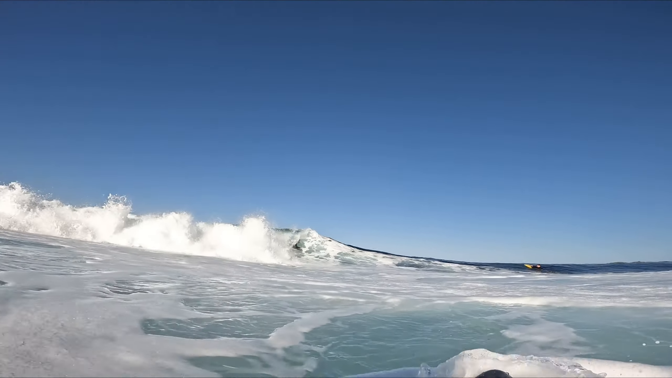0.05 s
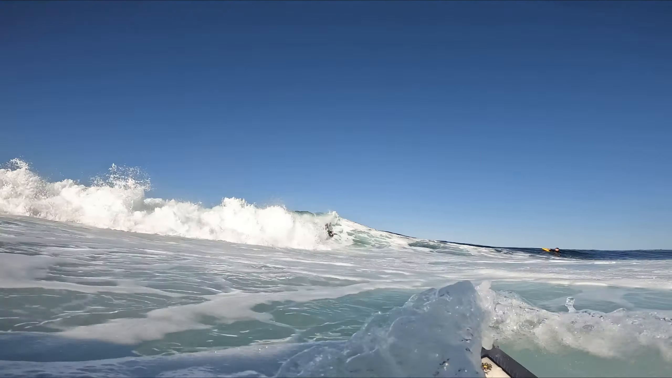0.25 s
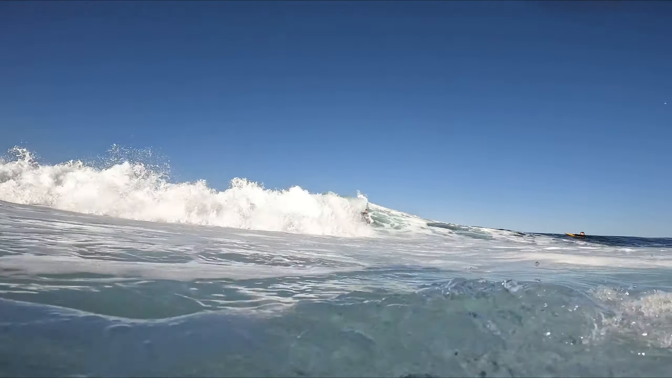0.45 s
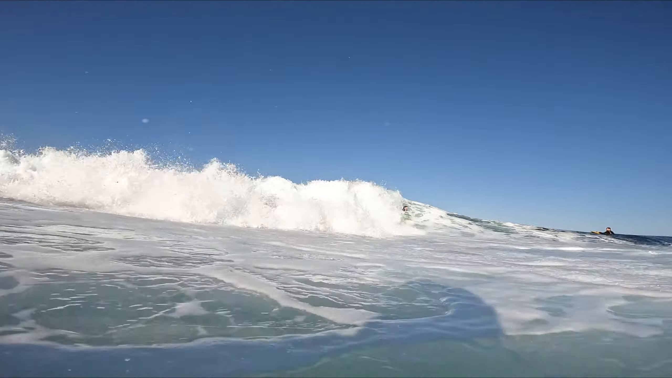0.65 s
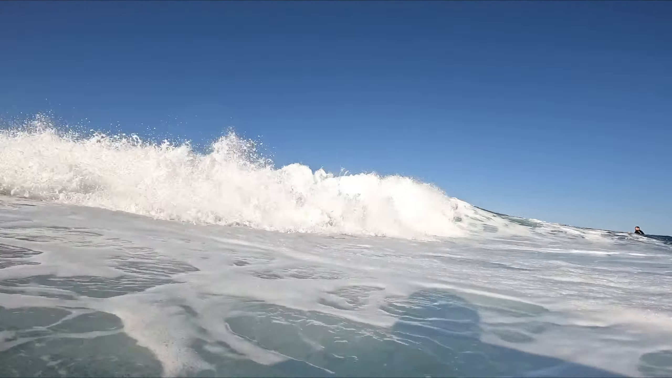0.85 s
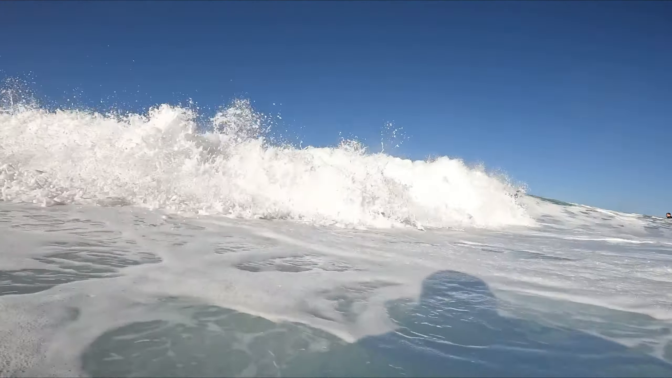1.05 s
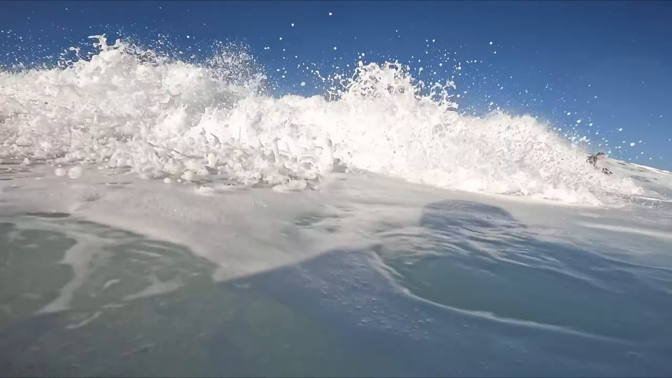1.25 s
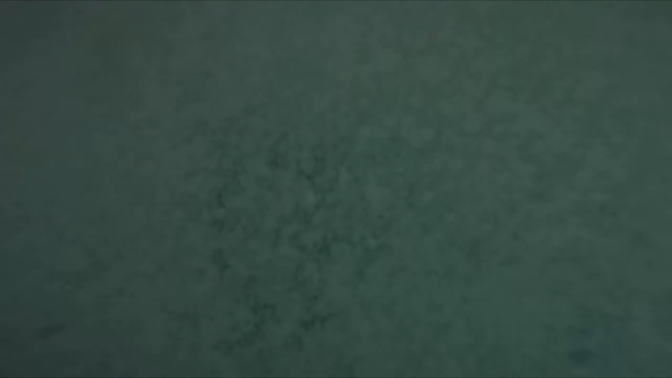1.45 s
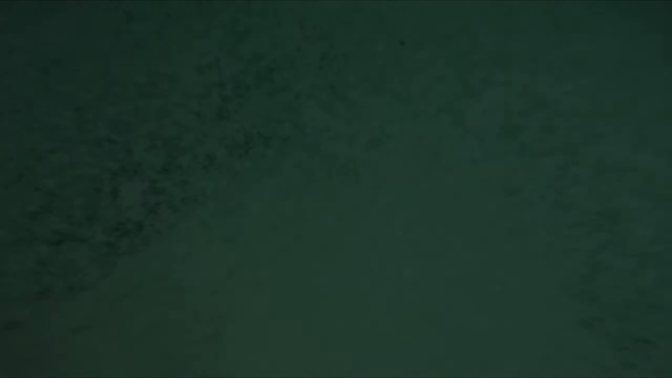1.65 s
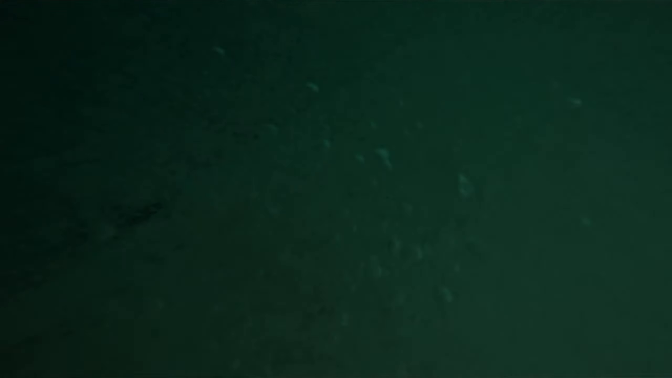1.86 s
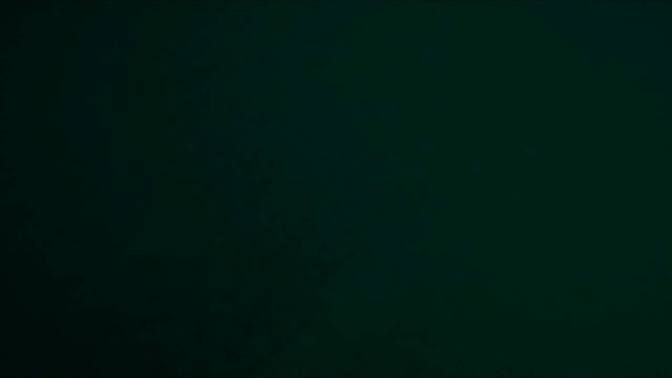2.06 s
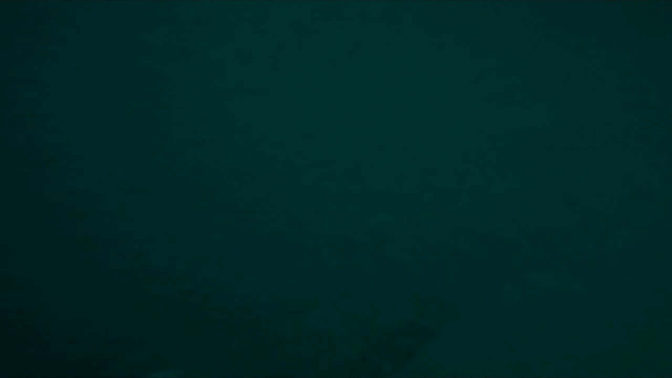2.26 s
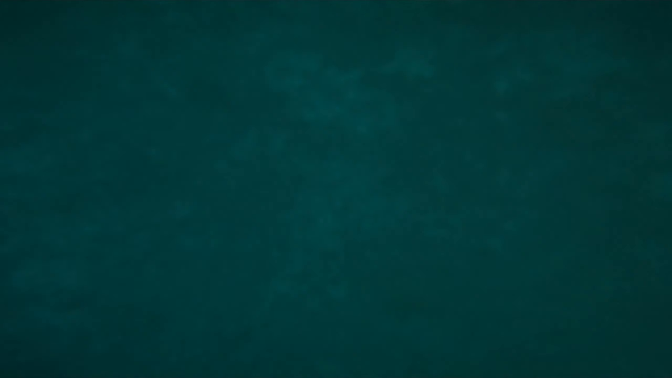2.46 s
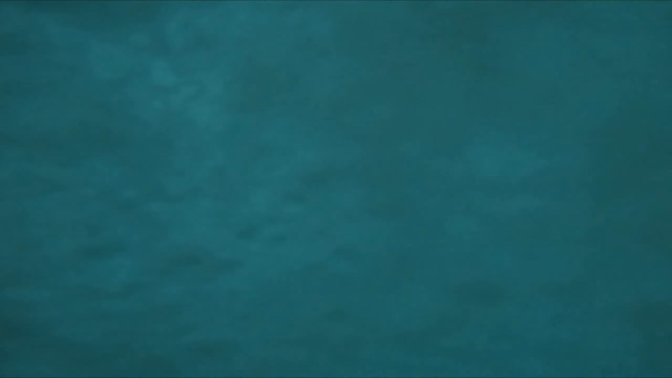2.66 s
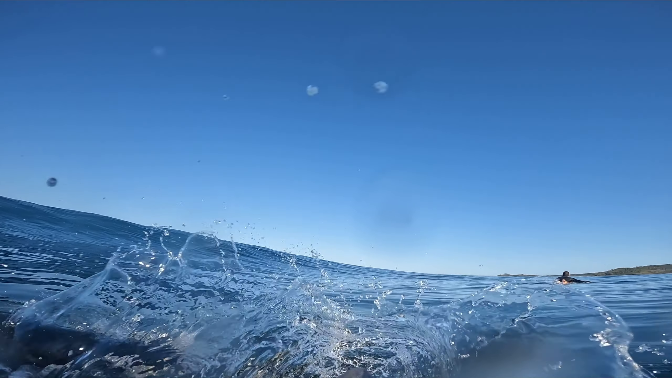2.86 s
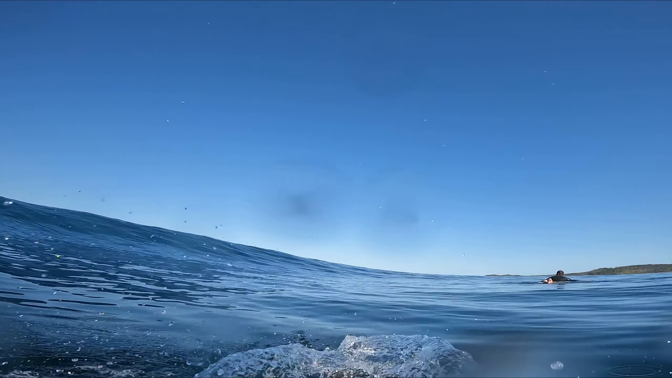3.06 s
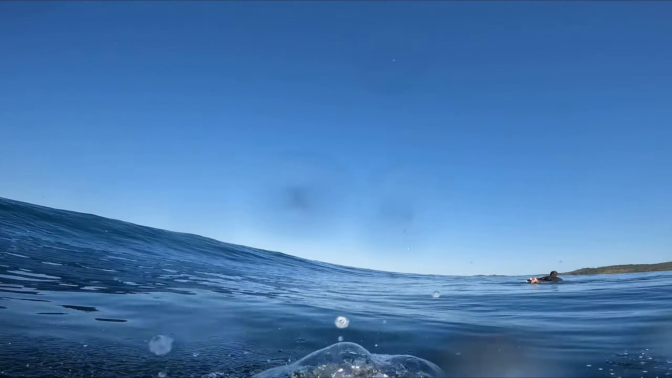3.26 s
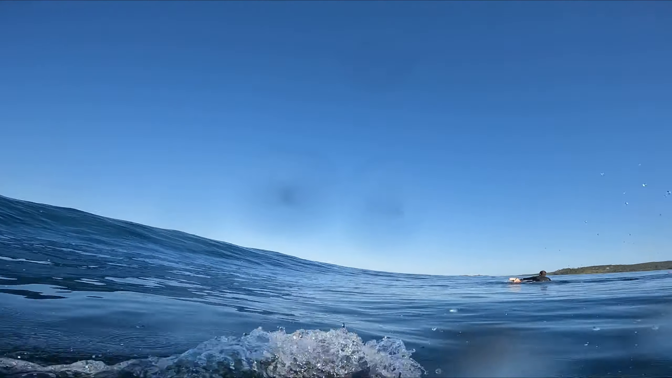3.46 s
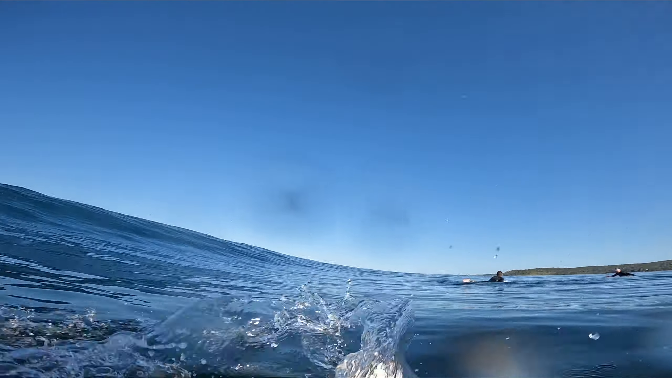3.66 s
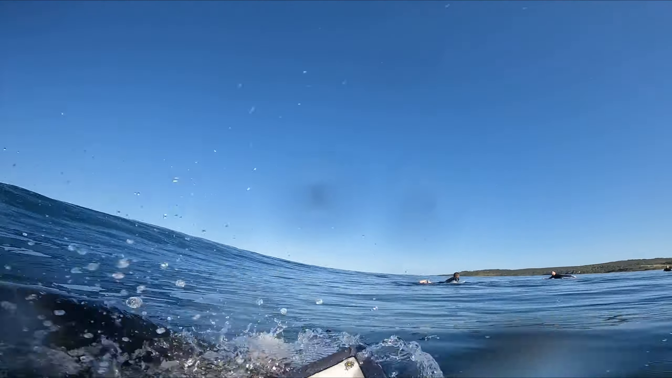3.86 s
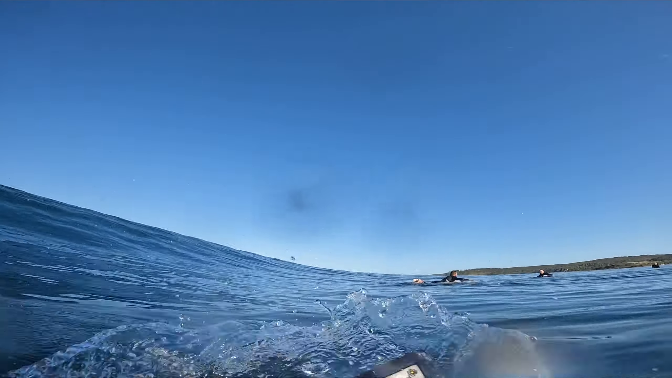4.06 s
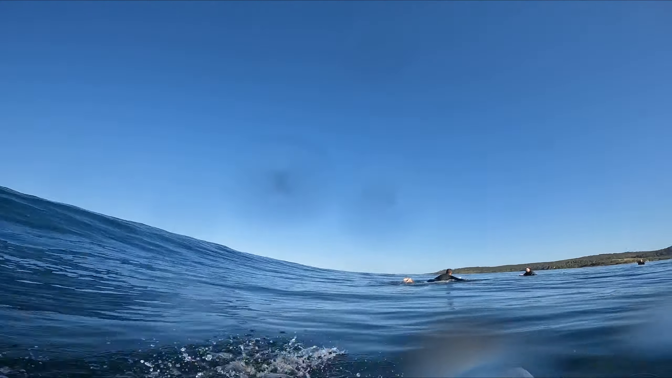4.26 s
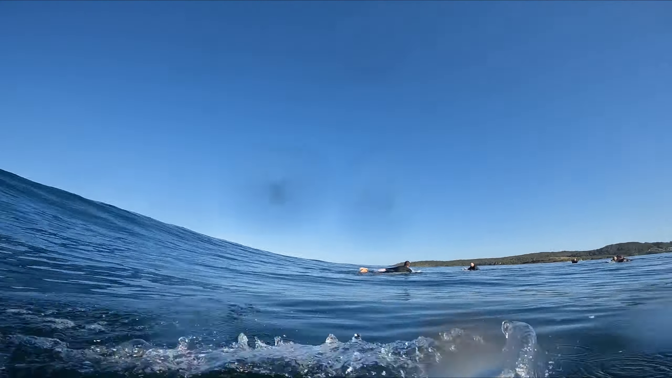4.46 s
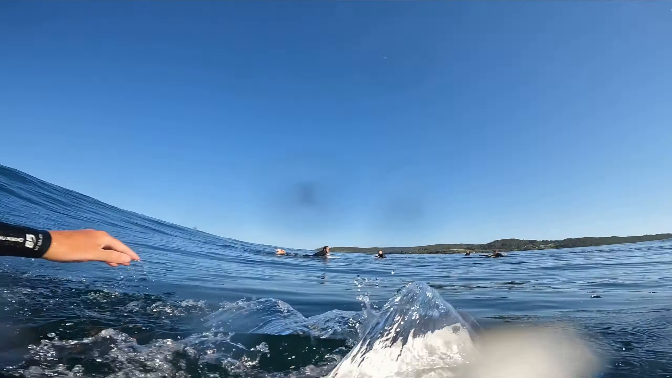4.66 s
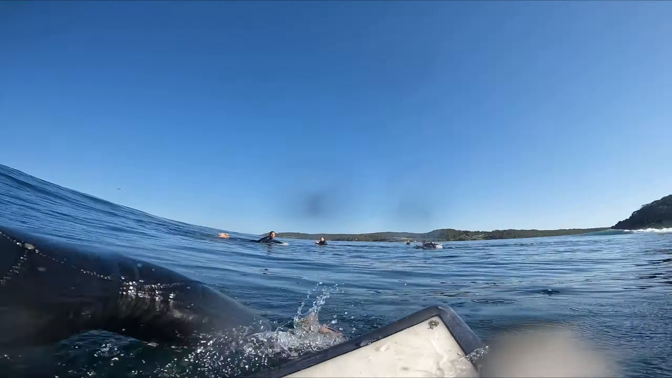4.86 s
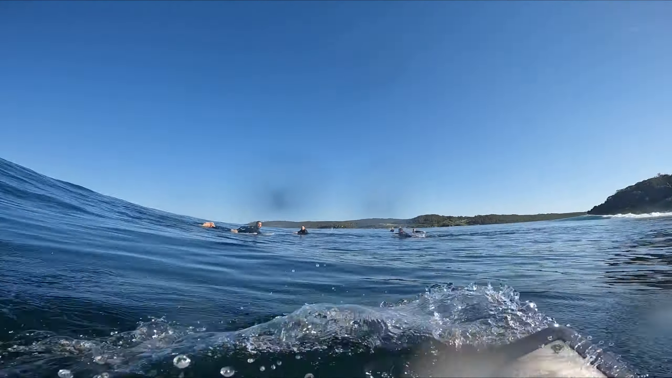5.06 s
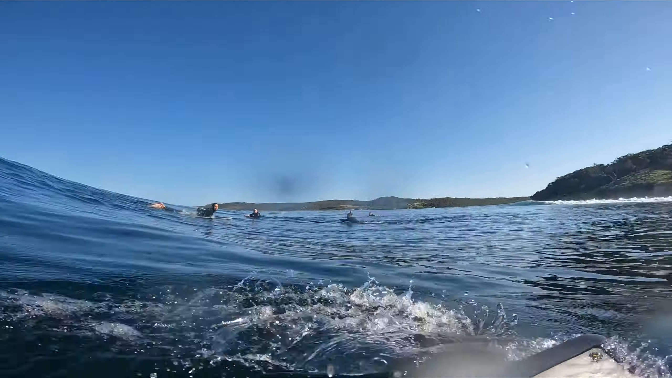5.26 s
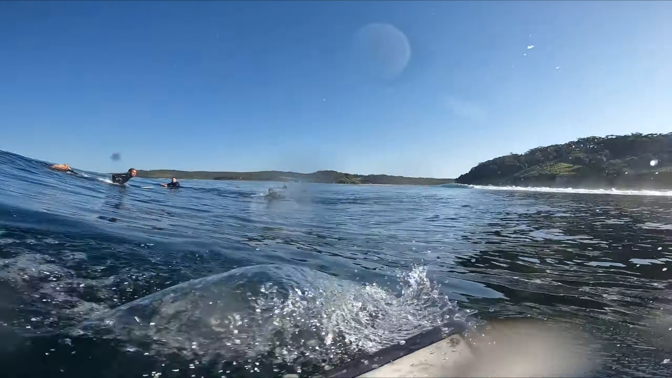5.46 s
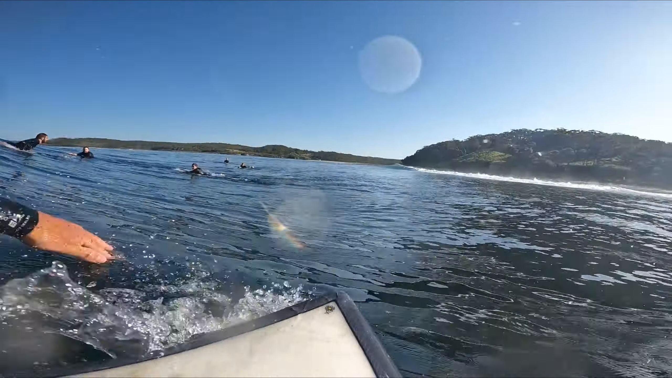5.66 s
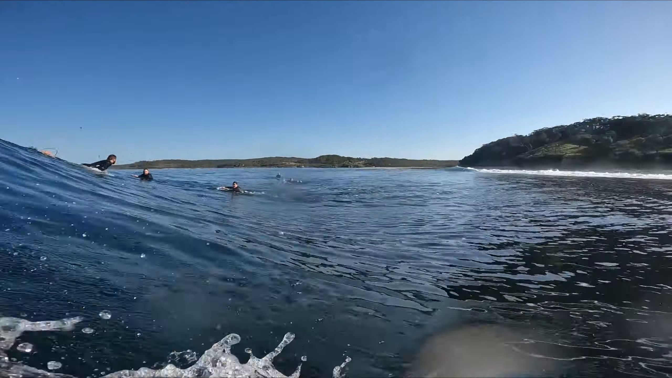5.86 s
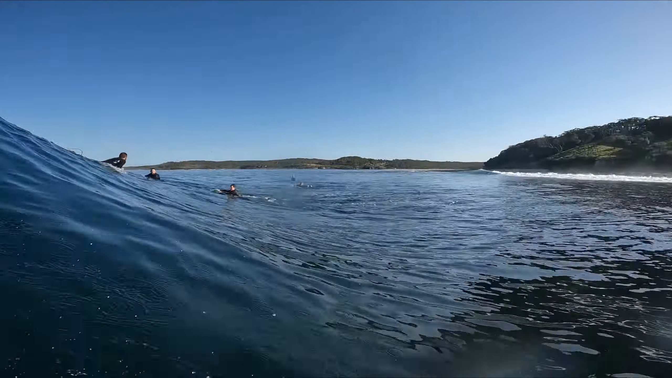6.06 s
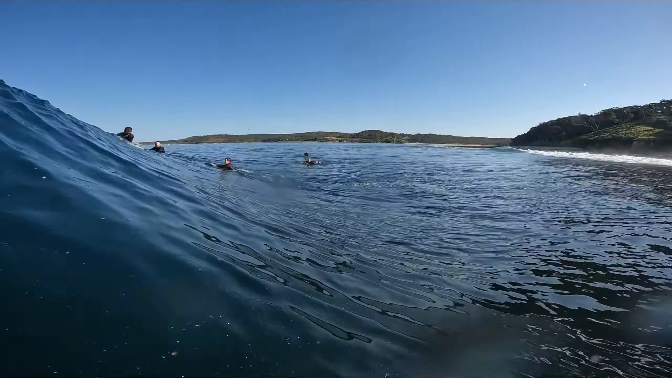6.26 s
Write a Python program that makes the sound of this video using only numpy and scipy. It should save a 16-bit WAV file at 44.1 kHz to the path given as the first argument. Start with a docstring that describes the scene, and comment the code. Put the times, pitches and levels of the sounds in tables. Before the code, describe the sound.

A low roar with bubbling wash grows hissier until a breaking wave hits the microphone in a loud, clipped burst of cracks and thumps. Submerged, only low pressure rumble, sparse bloops and small snapping bubbles remain. The sound drops out briefly and returns quieter in open water, with a short gush, surging gurgles, wet slaps and soft thumps as the board is paddled.

```python
"""White water rumbles and gurgles round a surfboard, its foam hissing up until it hits and the board dives.
The sound drops out, then returns on calm water that gurgles and slaps as the board is paddled.
Shaped noise and swarms of bubbles make the wash, froth and spray; single bubbles, slaps, pressure thumps
and cracks are placed by hand. A wet membrane dulls the bloops, slaps and ticks."""
import sys
import numpy as np
from scipy import signal
from scipy.fft import rfft, irfft
from scipy.io import wavfile
from scipy.ndimage import uniform_filter1d

SR = 44100
rng = np.random.default_rng(int(sys.argv[2]) if len(sys.argv) > 2 else 0)


def to_wav(sig):
    """Store sig (one row per channel, or 1-D mono) as 16-bit WAV at the path in sys.argv[1].

    Samples outside -1..1 are clipped; the rate is SR.
    """
    pcm = np.clip(np.atleast_2d(sig), -1, 1) * 32767
    pcm = np.round(pcm).astype(np.int16)
    wavfile.write(sys.argv[1], SR, pcm.T)  # frames by channels


N = 278620
# Spectra give only a shape: every coloured sound is brought to rms 1 before its level is applied.


def seconds():
    """Time of every sample, in seconds."""
    return np.arange(N) / SR


def amp(db):
    """Turns decibels into a gain."""
    return 10 ** (np.asarray(db) / 20)


def evened(x):
    """Brings a sound to rms 1."""
    return x / np.sqrt(np.mean(x ** 2) + 1e-20)


def over_hz(points, hz):
    """Reads a spectrum; above its last point an extra 30 dB an octave rolls it off."""
    f, db = np.transpose(points)
    shape_db = np.interp(np.log(hz + 1), np.log(f + 1), db)
    return shape_db - 30 * np.log2(np.maximum(hz / f[-1], 1))


def over_time(rows, column):
    """Draws a table column as a slightly smoothed automation line."""
    rows = np.asarray(rows)
    line = np.interp(seconds(), rows[:, 0], rows[:, column])
    return uniform_filter1d(line, size=151)


def faded(rows, column):
    """Gain along a dB column, silent outside the table's span apart from 10 ms fades."""
    first, last = rows[0][0], rows[-1][0]
    fade = np.interp(seconds(), [first - .01, first, last, last + .01], [0, 1, 1, 0])
    return fade * amp(over_time(rows, column))


def add(mix, s, sound):
    """Drops a sound into the mix at s seconds."""
    part = mix[round(s * SR):][:len(sound)]
    part += sound[:len(part)]


def coloured(x, spectrum):
    """Gives a sound a spectrum, rms 1."""
    gain = amp(over_hz(spectrum, np.fft.rfftfreq(N, 1 / SR)))
    return evened(irfft(rfft(x) * gain, N))


def churn(spectrum, size, patchy_db, gusty_db):
    """Noise whose level wanders in patches of time and pitch and flickers over all pitches at once."""
    frames = 4 * N // size + 5
    real, imaginary, patches = rng.standard_normal((frames, size // 2 + 1, 3)).T
    patches = uniform_filter1d(patches, size=5, axis=0)
    patches = evened(uniform_filter1d(patches, size=6, axis=1))
    gusts = evened(uniform_filter1d(rng.standard_normal(frames), size=4))
    grains = (real + 1j * imaginary) * amp(patchy_db * patches + gusty_db * gusts)
    noise = signal.istft(grains, nperseg=size, noverlap=3 * size // 4)[1][:N]
    return coloured(noise, spectrum)


def bubble(hz, t60, rise, soft_s):
    """A softly started, dying sine; its pitch glides by the share rise per second, down if negative."""
    t = np.arange(round(np.clip(t60, .002, .3) * SR)) / SR
    decay = amp(-60 * t / t60)
    onset = 1 - np.exp(-(t / soft_s) ** 2)
    return decay * onset * np.sin(2 * np.pi * hz * (t + rise * t ** 2 / 2))


def swarm(spectrum, low_hz, high_hz, per_s, turns, spread_db, count=28):
    """Bubbles of many sizes at random moments; most are faint, a few stand out."""
    strength = amp(spread_db * np.minimum(rng.exponential(1, N), 4))
    hits = strength * (rng.random(N) < per_s / SR)
    kind, out = rng.integers(0, count, N), np.zeros(N)
    for k, hz in enumerate(np.geomspace(low_hz, high_hz, count)):
        one = bubble(hz, turns / hz, 0.022 * hz, 1.0 / hz)
        one = one * np.sqrt(hz) / np.linalg.norm(one)
        out += signal.oaconvolve(hits * (kind == k), one)[:N]
    return coloured(out, spectrum)


# level of a thin high sizzle: time_s, level_db
SIZZLE_LEVEL = [(4.8, -104), (5.16, -88), (5.27, -77), (5.42, -75), (5.45, -69), (5.51, -68), (5.58, -84),
                (5.61, -69), (5.67, -79), (5.78, -73), (5.88, -74), (5.98, -97), (6.07, -84), (6.16, -83),
                (6.19, -87), (6.3, -73)]
SIZZLE_HZ, SIZZLE_WIDE_HZ = 12250, 710


def sizzle():
    """Patchy, flickering noise squeezed into one narrow high band."""
    band = [(SIZZLE_HZ - 3 * SIZZLE_WIDE_HZ, -55), (SIZZLE_HZ - SIZZLE_WIDE_HZ, -14), (SIZZLE_HZ, 0),
            (SIZZLE_HZ + SIZZLE_WIDE_HZ, -4), (SIZZLE_HZ + 3 * SIZZLE_WIDE_HZ, -20), (15800, -26)]
    return faded(SIZZLE_LEVEL, 1) * churn(band, size=128, patchy_db=5.0, gusty_db=1.5)


# surges of water past the board, each lifting the wash: peak_s, lift_db, length_s
SURGES = [(0.556, 2.5, 0.13), (1.392, 10.5, 0.027), (1.635, 7.5, 0.041), (1.708, 9.5, 0.023),
          (1.776, 5.5, 0.048), (1.853, 4.5, 0.018), (1.945, 11.5, 0.009), (2.131, 18, 0.0059),
          (2.516, 6, 0.021), (3.152, 3, 0.055), (3.516, 4.5, 0.07), (3.654, 3, .03), (3.856, 5.5, 0.035),
          (3.924, 12, 0.037), (3.989, 7.5, 0.021), (4.133, 8, 0.26), (4.518, 7, 0.26), (4.936, 9, 0.052),
          (5.122, 4, 0.03), (5.346, 2.5, 0.036), (5.469, 6, 0.13), (5.773, 5.5, 0.12), (6.078, 4, 0.05),
          (6.132, 4, 0.03), (6.251, 2, 0.045)]
SURGE_RISE = .4  # the rise takes this share of the length


def surges():
    """Lift in dB over time: each surge rises quickly and ebbs more slowly."""
    lift_db = np.zeros(N)
    for s, db, length in SURGES:
        u = (seconds() - s) / length
        lift_db += db * np.where(u < 0, np.exp(-(u / SURGE_RISE) ** 2), np.exp(-u ** 2))
    return lift_db


# a sheet of water sealing the microphone port: start_s, end_s, level_db
SMOTHER = (1.387, 1.398, -12)


def smother():
    """Gain of the wash while the port is sealed: sinks in a few milliseconds, bursts back in one."""
    start, end, db = SMOTHER
    return amp(np.interp(seconds(), [start - .005, start, end, end + .001], [0, db, db, 0]))


# the wash before surges: time_s, buffeting_level_db, roar_level_db, gurgle_level_db, splash_level_db
WASH_LEVELS = [(0.0, -23.5, -17, -28, -51), (0.54, -26.5, -17, -27.5, -52.5),
               (0.95, -21.5, -18.5, -33, -57), (1.33, -23, -17, -27.5, -53.5), (1.48, -9, -19, -19, -39.5),
               (1.6, -25, -23, -33.5, -64), (1.78, -19.5, -34.5, -31.5, -66),
               (1.92, -20.5, -35, -38, -62.5), (2.3, -24, -32, -42, -70), (2.5, -18.5, -35.5, -30, -68.5),
               (2.75, -20, -20.5, -30.5, -69), (2.77, -25.5, -32.5, -26, -47.5),
               (2.95, -26.5, -28, -27, -50), (3.28, -30.5, -35.5, -31.5, -55.5),
               (3.62, -30, -31.5, -29.5, -52), (3.75, -31.5, -38.5, -27.5, -51),
               (4.0, -28.5, -25, -33.5, -53.5), (4.6, -35, -37, -32, -52), (4.75, -29.5, -37.5, -34.5, -53),
               (5.3, -32, -30, -28.5, -51), (5.72, -27.5, -32.5, -31, -52.5),
               (5.95, -29, -25.5, -30.5, -53.5), (6.32, -25.5, -27.5, -25, -48)]
# pressure lumps on the membrane in the surf: freq_hz, level_db (per Hz)
BUFFET_SPECTRUM = [(8, 5), (25, 6), (60, 6), (110, 2.5), (200, -10), (400, -77)]
# pressure lumps on calm water: freq_hz, level_db (per Hz)
HEAVE_SPECTRUM = [(8, -13.5), (25, 6.5), (45, -1.5), (80, -12.5), (150, -23), (400, -71)]
# low roar: freq_hz, level_db (per Hz)
ROAR_SPECTRUM = [(50, -5), (100, -2.5), (180, -2.5), (300, -2.5), (450, -9), (800, -16.5), (1500, -96)]
# gurgling round the board: freq_hz, level_db (per Hz)
GURGLE_SPECTRUM = [(120, -12), (280, -5.5), (450, -2.5), (800, -4), (1050, -12), (1400, -25.5),
                   (2000, -53.5), (4000, -91.5)]
# fine splash: freq_hz, level_db (per Hz)
SPLASH_SPECTRUM = [(700, -23.5), (1400, -1), (2200, -11), (3500, -21), (5000, -30.5), (6500, -37),
                   (8000, -53.5), (12000, -78.5)]
SURGE_ROAR, SURGE_SPLASH = 0.12, .7  # shares of the surge lift that reach roar and splash


def gurgle(in_surf):
    """Air and water tumbling round the board: churned noise blended with bubbles."""
    t = seconds()
    # distant white water blurs into a smoother rush; from the first strike more bubbles stand out
    near = np.where(t < STRIKES[0][0], .4, .75)
    wash = np.sqrt(1 - near ** 2) * churn(GURGLE_SPECTRUM, size=512, patchy_db=2.8, gusty_db=1.8)
    wash += near * swarm(GURGLE_SPECTRUM, 220, 1800, 800, 10, 4)
    wash = evened(wash)
    # submerged: fewer, separate bubbles
    under = in_surf * np.clip((t - 1.5) * 10, 0, 1)
    blips = .6 * wash + .8 * swarm(GURGLE_SPECTRUM, 250, 1800, 400, 8, 3.5)
    return np.sqrt(1 - under) * wash + np.sqrt(under) * blips


def water():
    """Four layers round the board, from pressure lumps on the membrane up to fine splash."""
    lift_db = surges()
    in_surf = seconds() < DROPOUT_S[1]
    surf_lumps = churn(BUFFET_SPECTRUM, size=2048, patchy_db=0.5, gusty_db=0.0)
    calm_lumps = churn(HEAVE_SPECTRUM, size=2048, patchy_db=0.5, gusty_db=0.0)
    lumps = np.where(in_surf, surf_lumps, calm_lumps)
    roar = churn(ROAR_SPECTRUM, size=1024, patchy_db=1.8, gusty_db=1.6)
    roar += .55 * swarm(ROAR_SPECTRUM, 90, 500, 500, 9, 4)
    splash = churn(SPLASH_SPECTRUM, size=512, patchy_db=2.5, gusty_db=2.2)
    splash += .7 * swarm(SPLASH_SPECTRUM, 1200, 7000, 900, 36, 4.0)
    out = amp(over_time(WASH_LEVELS, 1)) * lumps
    out += amp(over_time(WASH_LEVELS, 2) + SURGE_ROAR * lift_db) * evened(roar)
    out += amp(over_time(WASH_LEVELS, 3) + lift_db) * gurgle(in_surf)
    out += amp(over_time(WASH_LEVELS, 4) + SURGE_SPLASH * lift_db) * evened(splash)
    return out


# wavelets and blobs of water shoving the microphone: peak_s, peak_db, width_s
THUMPS = [(1.3756, -4, 0.001), (1.4, -5, 0.00057), (1.442, -8, 0.00089), (1.55, -7, .0006),
          (1.772, -18, 0.00054), (2.914, -8, 0.0015), (3.061, -17.5, 0.01), (3.177, -8, 0.00062),
          (3.613, -17.5, 0.01), (3.845, -12.5, 0.0061), (3.864, -10.5, .0006), (3.88, -14, 0.00046),
          (3.9958, -7, .0006), (4.517, -13, 0.00057), (4.527, -17, 0.0005), (4.673, -23, .008),
          (4.73, -20.5, 0.012), (4.83, -21, 0.0056), (4.939, -13, .0006), (4.95, -9, 0.00047),
          (4.96, -11, 0.00057), (5.132, -14, 0.00082), (5.521, -12.5, 0.018), (5.535, -14, .0007),
          (5.633, -17.5, 0.038), (6.178, -14, 0.011), (6.25, -17, 0.0054)]


def thumps():
    """One push of pressure with a small rebound either side."""
    out = np.zeros(N)
    for s, db, wide in THUMPS:
        u = np.arange(-4 * wide, 4 * wide, 1 / SR) / wide
        add(out, s - 4 * wide, amp(db) * (1 - u ** 2) * np.exp(-u ** 2))
    return out


# bursts of froth over the microphone under water, one table each: time_s, level_db
FROTH_BURSTS = [
    [(1.41, -48), (1.445, -39), (1.47, -38.5), (1.5, -41), (1.514, -32), (1.548, -46), (1.58, -46),
     (1.62, -52.5), (1.7, -54), (1.76, -67), (1.82, -70)],
    [(2.42, -80), (2.48, -69.5), (2.542, -64), (2.59, -68), (2.66, -74), (2.74, -78)],
]
# froth: freq_hz, level_db (per Hz)
FROTH_SPECTRUM = [(900, -40), (1500, -5), (2300, -3), (3000, -6), (3600, -13), (4200, -28), (8000, -71)]
# water draining off the microphone: time_s, level_db
DRAIN_LEVEL = [(2.775, -42), (2.787, -38.5), (2.83, -41), (2.866, -44), (2.885, -62)]
# draining gush: freq_hz, level_db (per Hz)
GUSH_SPECTRUM = [(900, -8), (1300, -3), (1800, -4), (2150, 0), (2550, -1), (2850, -10), (3100, -32)]


def froth():
    """A dense cloud of small bubbles that comes in spurts; on surfacing a narrower gush."""
    cloud = .6 * churn(FROTH_SPECTRUM, size=128, patchy_db=2.0, gusty_db=5)
    cloud += .8 * swarm(FROTH_SPECTRUM, 1300, 4500, 1200, 11, 4)
    gush = churn(GUSH_SPECTRUM, size=256, patchy_db=1.5, gusty_db=1.5)
    bursts = sum(faded(rows, 1) for rows in FROTH_BURSTS)
    return evened(cloud) * bursts + gush * faded(DRAIN_LEVEL, 1)


# spray of the nearing foam wall, of its collapse, and a late fizz under water, one table each:
# time_s, hiss_level_db, top_level_db
SPRAY_BURSTS = [
    [(0.96, -71, -115), (1.078, -56, -108), (1.2, -50, -92), (1.336, -46, -76), (1.36, -47.5, -74)],
    [(1.405, -35.5, -63), (1.435, -56.5, -65), (1.56, -66, -99)],
    [(1.975, -72.5, -110), (2.02, -69.5, -110), (2.065, -73, -110)],
]
# foam hiss: freq_hz, level_db (per Hz)
FOAM_SPECTRUM = [(1200, -33), (2500, -3), (3900, 7.5), (5000, -2.5), (6500, -10.5), (8000, -24.5),
                 (9500, -58), (16000, -80)]
# top octave of the spray: freq_hz, level_db (per Hz)
TOP_SPECTRUM = [(6000, -28), (8000, -1.5), (10500, -15), (12400, -6), (15500, -18)]


def spray():
    """Foam hiss of noise and tiny bubbles that swells with the wave, with a faint top octave."""
    hiss = .5 * churn(FOAM_SPECTRUM, size=256, patchy_db=1.0, gusty_db=.5)
    hiss += .5 * swarm(FOAM_SPECTRUM, 2000, 8000, 2500, 9, 3.5)
    hiss = evened(hiss)
    top = churn(TOP_SPECTRUM, size=128, patchy_db=1.5, gusty_db=3)
    return sum(faded(rows, 1) * hiss + faded(rows, 2) * top for rows in SPRAY_BURSTS)


# water striking the camera in separate cracks: start_s, level_db
STRIKES = [(1.368, -21), (1.3764, -19.5), (1.381, -20), (1.3875, -18), (1.39, -18.5), (1.394, -18.5),
           (1.3986, -26.5), (1.434, -41), (1.515, -44), (3.662, -47), (6.141, -44)]
# crack: freq_hz, level_db (per Hz)
CRACK_SPECTRUM = [(700, -4), (1500, 4), (2500, -2.5), (3500, 1), (4800, -3.5), (6500, -14), (8000, -38),
                  (12000, -41.5), (15500, -49.5)]
CRACK_RISE_S, CRACK_T60_S = 0.00055, 0.02


def cracks():
    """Wide noise switched on within about a millisecond by each strike, then dying fast."""
    gain, t = np.zeros(N), np.arange(4096) / SR
    onset = 1 - np.exp(-(t / CRACK_RISE_S) ** 2)
    for s, db in STRIKES:
        add(gain, s, amp(db - 60 * t / CRACK_T60_S) * onset)
    return gain * coloured(rng.standard_normal(N), CRACK_SPECTRUM)


# big air pockets closing against the board: start_s, level_db, pitch_hz
BLOOPS = [(0.058, -12, 600), (0.34, -21, 603), (0.466, -1.5, 433), (0.514, -0.5, 352), (1.3998, 3, 340),
          (1.44, -0.5, 490), (1.473, -0.5, 204), (1.546, 0.5, 456), (1.638, -4.5, 543), (1.653, -4, 386),
          (1.708, -9, 780), (1.769, -13, 752), (1.848, -12, 630), (1.878, -23, 830), (1.942, -20, 720),
          (2.523, -9.5, 500), (2.543, -8.5, 547), (3.138, -18, 716), (3.477, -16, 610), (3.544, -28, 593),
          (3.503, -11.5, 604), (3.719, -11, 660), (3.855, -11, 466), (3.913, -15.5, 395),
          (3.994, -9, 211.2), (4.077, -16, 278), (4.498, -13.5, 353), (4.514, -17.5, 483),
          (4.573, -16.5, 593), (4.755, -17, 493), (4.775, -22, 1264), (4.944, -17, 592), (5.095, -16, 704),
          (5.204, -17, 480), (5.275, -17, 670), (5.361, -15, 1030), (5.544, -12.5, 295), (5.759, -10, 463),
          (6.143, -6.5, 336), (6.245, -16, 460)]
BLOOP_T60_SURF_S = 0.036  # white water damps the pockets
BLOOP_T60_CALM_S = 0.076  # at 400 Hz
BLOOP_LONGER = .9  # on calm water low pockets ring longer: t60 goes as pitch to minus this power
SHED_DB, SHED_LATEST_S = -5, .012  # neighbours' level against their pocket, and latest delay


def bloops(out):
    """Pockets ring with rising pitch, and each sheds two shorter neighbours nearby in time and pitch."""
    for (s, db, hz), shed in zip(BLOOPS, rng.random((len(BLOOPS), 2, 2))):
        in_surf = s < DROPOUT_S[0]
        t60 = BLOOP_T60_SURF_S if in_surf else BLOOP_T60_CALM_S * (hz / 400) ** -BLOOP_LONGER
        add(out, s, amp(db) * bubble(hz, t60, 2.9, 0.0038))
        for late, size in shed:
            near_hz = hz * (.85 + .6 * size)
            add(out, s + SHED_LATEST_S * late, amp(db + SHED_DB) * bubble(near_hz, .5 * t60, 3, .002))


# wet slaps, short spits of noise: start_s, level_db
SLAPS = [(0.516, -37), (1.206, -26.5), (1.438, -15.5), (1.544, -24), (1.878, -39), (3.501, -29),
         (3.662, -30), (3.83, -29), (4.061, -28.5), (4.811, -33), (4.915, -37), (4.947, -31), (5.095, -38),
         (5.361, -36), (5.469, -29.5), (5.526, -28), (6.143, -20.5)]
SLAP_HZ, SLAP_SPREAD = 1090, .08  # typical pitch, and its random scatter as a share
SLAP_RISE_S, SLAP_T60_S = .003, 0.082


def slap(hz, t60, noise):
    """Noise around a centre pitch with a quick rise and a short tail."""
    t = np.arange(len(noise)) / SR
    band = signal.butter(3, [0.41 * hz, 1.19 * hz], "bandpass", fs=SR, output="sos")
    onset = 1 - np.exp(-(t / SLAP_RISE_S) ** 2)
    return evened(signal.sosfilt(band, noise)) * amp(-60 * t / t60) * onset


def slaps(out):
    """Each slap is a fresh spit of noise at a slightly scattered pitch."""
    for (s, db), noise in zip(SLAPS, rng.standard_normal((len(SLAPS), 4097))):
        hz = SLAP_HZ * (1 + SLAP_SPREAD * noise[0])
        add(out, s, amp(db) * slap(hz, SLAP_T60_S, noise[1:]))


# small bubbles snapping at the microphone port: start_s, level_db, pitch_hz
TICKS = [(0.465, -35.5, 2600), (0.516, -27.5, 2600), (0.547, -31, 1600), (0.577, -31, 1490),
         (1.298, -39, 4800), (1.3423, -20, 3430), (1.3945, -20, 1900), (1.3975, 0, 1190), (1.406, -9, 3370),
         (1.428, -21, 2400), (1.453, -10, 2000), (1.509, -21, 1500), (1.513, -10, 2470),
         (1.5135, -29, 4700), (1.536, -11, 1800), (1.549, -16, 1600), (1.5826, -21, 2870),
         (1.605, -24, 3100), (1.599, -32, 3300), (1.618, -14, 1820), (1.6337, -33, 3500),
         (1.636, -29, 2300), (1.6656, -28, 3420), (1.6737, -20, 3120), (1.692, -23, 2700),
         (1.7207, -40, 2800), (1.7399, -31, 2900), (1.746, -28, 2200), (1.772, -23, 1500),
         (1.81, -44, 2000), (1.862, -37, 2000), (1.8778, -37.5, 3100), (1.904, -46.5, 1930),
         (1.9782, -24, 3300), (1.9863, -27.5, 3780), (1.994, -34, 3090), (2.01, -24.5, 3570),
         (2.0182, -33, 3630), (2.0224, -36, 3300), (2.0304, -35, 3320), (2.0484, -35, 2930),
         (2.0564, -43, 3720), (2.123, -41, 3530), (2.132, -38, 4080), (2.144, -47, 3900),
         (2.185, -50, 2200), (2.257, -51, 1790), (2.299, -44, 2000), (2.317, -52, 3200),
         (2.448, -44.5, 2200), (2.475, -45, 2700), (2.459, -41, 1690), (2.504, -32.5, 1500),
         (2.527, -33, 1800), (2.547, -29, 1880), (2.564, -36, 2210), (2.577, -38, 2010), (2.614, -44, 2610),
         (3.483, -33, 1790), (3.6626, -33, 2600), (4.141, -34, 3440), (4.204, -44, 3970),
         (4.315, -40, 5360), (4.4837, -32, 2100), (4.753, -33, 3000), (4.8135, -35, 1500),
         (4.898, -33, 3320), (5.1183, -24, 2200), (5.127, -42, 4300), (5.268, -30, 2600), (5.88, -42, 3830),
         (6.075, -47, 3620), (6.141, -37, 3900)]
AFTER_RING_DB = -15  # against the snap


def ticks(out):
    """A few-millisecond snap of falling pitch, with a lower, fainter after-ring."""
    for s, db, hz in TICKS:
        add(out, s, amp(db) * bubble(hz, 0.004, -30.5, 0.00038))
        add(out, s + .001, amp(db + AFTER_RING_DB) * bubble(.63 * hz, .016, 4, .0012))


def pockets():
    """Single bloops, slaps and ticks; the wet membrane dulls every snap."""
    out = np.zeros(N)
    bloops(out)
    slaps(out)
    ticks(out)
    membrane = signal.butter(4, 5200, fs=SR, output="sos")
    return signal.sosfilt(membrane, out)


def scene():
    """Sums the layers from background to foreground; only the wash is smothered."""
    wash = smother() * water()
    mix = sizzle() + wash + thumps() + froth() + spray() + cracks() + pockets()
    return mix[None]


# the dropout: stop_s (stops dead), start_s (starts to return), full_s (back in full)
DROPOUT_S = (2.7438, 2.764, 2.795)
EDGE_HZ = 15800  # upper band limit


def record(dry):
    """The sound stops dead and fades back in; then hard limiting, a very faint noise floor, a band limit."""
    stop, start, full = DROPOUT_S
    t = seconds()
    # the stop is a click: a quick pull to one side, then a jump to rest
    snap = (t < stop) * np.exp(np.minimum(t - stop, 0) / .0004)
    comeback = np.sin(np.pi / 2 * np.clip((t - start) / (full - start), 0, 1)) ** 2
    gate = np.where(t < stop, 1 - snap, comeback)
    # soft start and end
    to_edge = np.minimum(t, t[::-1])
    gate *= np.sin(np.pi / 2 * np.minimum(to_edge / .002, 1)) ** 2
    out = np.clip(dry * gate - amp(-21) * snap, -.94, .94)
    out = out + amp(-104) * rng.standard_normal(N)
    band_limit = signal.firwin(511, EDGE_HZ, window=("kaiser", 9), fs=SR)
    return signal.oaconvolve(out, band_limit[None], "same")


dry = scene()
out = record(dry)
to_wav(out)
```